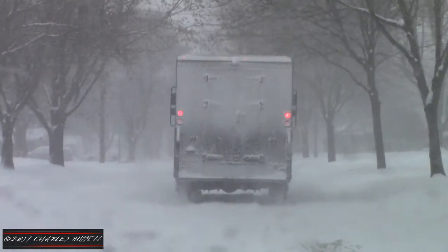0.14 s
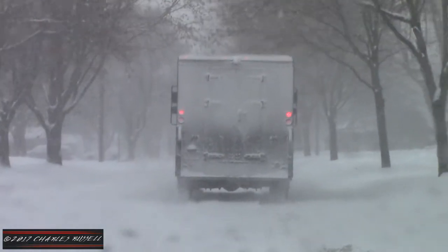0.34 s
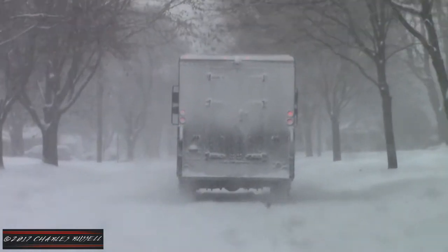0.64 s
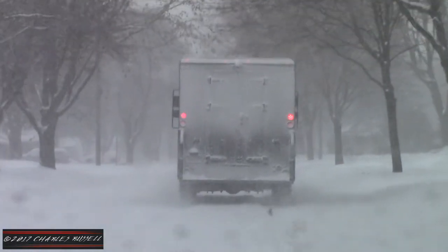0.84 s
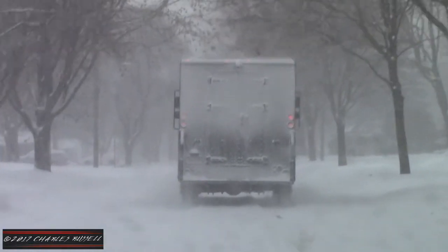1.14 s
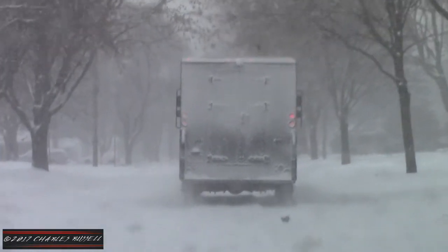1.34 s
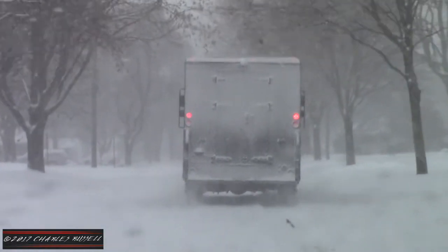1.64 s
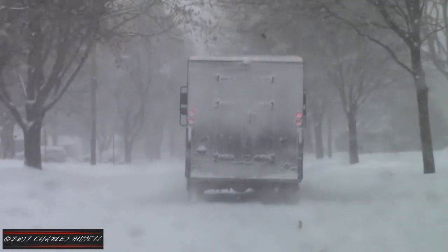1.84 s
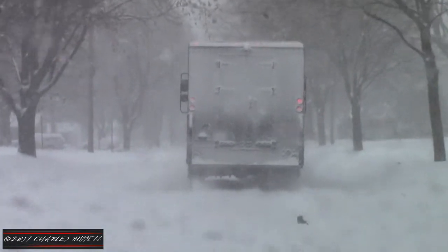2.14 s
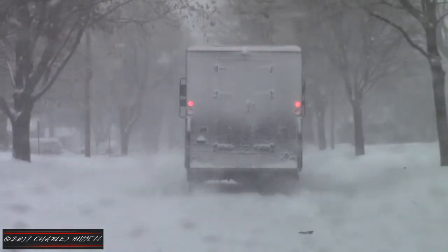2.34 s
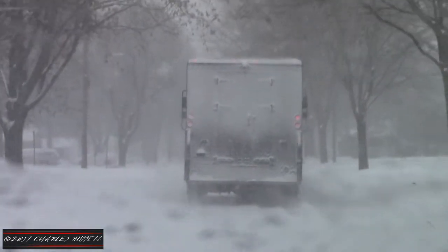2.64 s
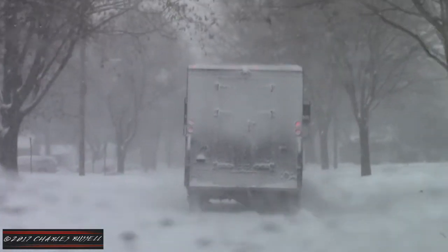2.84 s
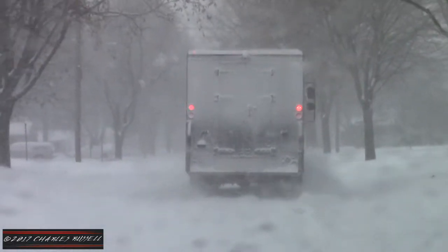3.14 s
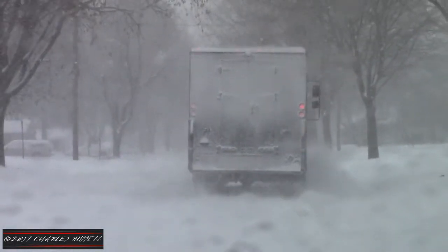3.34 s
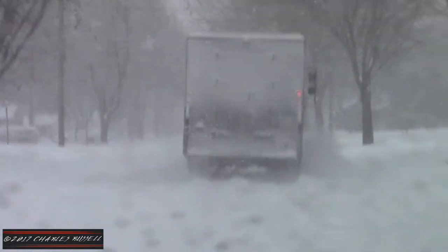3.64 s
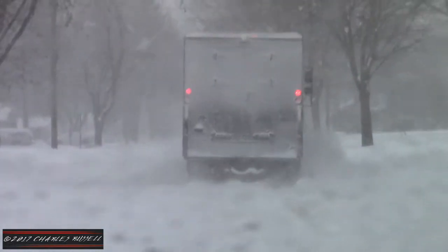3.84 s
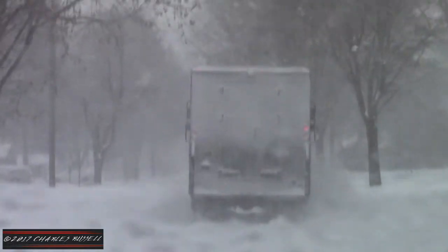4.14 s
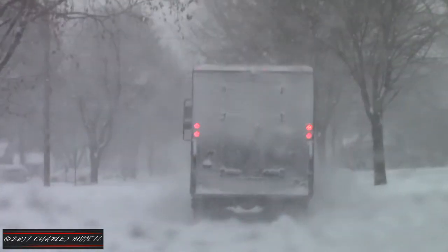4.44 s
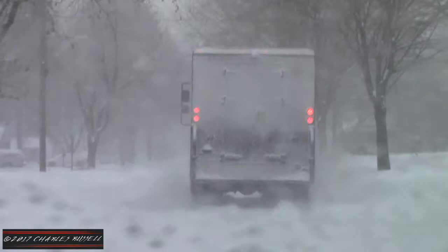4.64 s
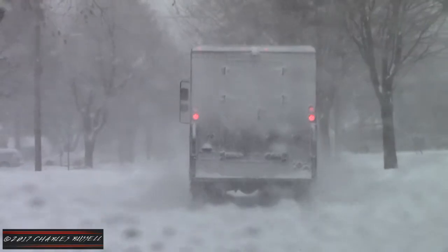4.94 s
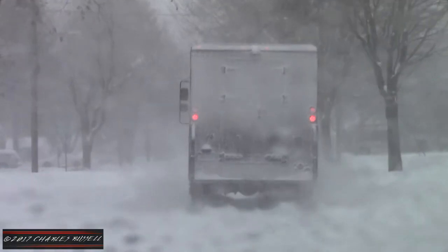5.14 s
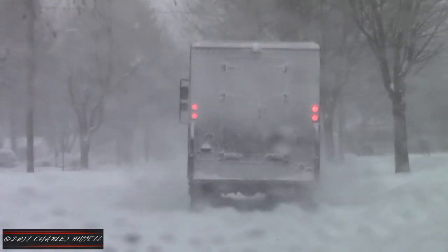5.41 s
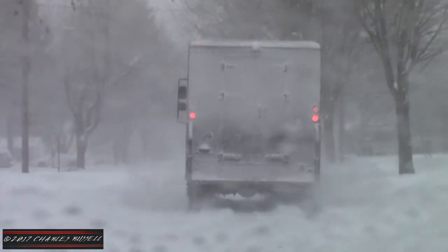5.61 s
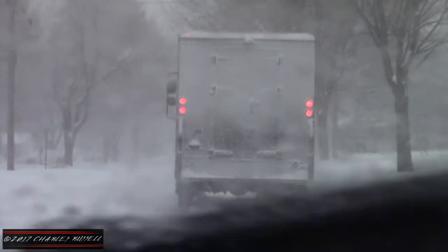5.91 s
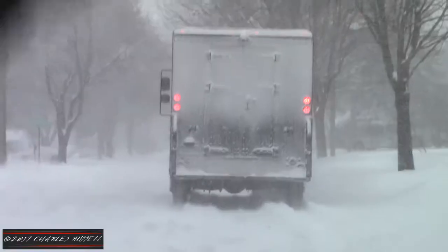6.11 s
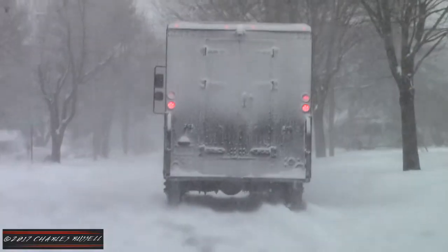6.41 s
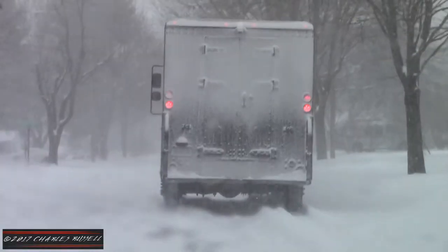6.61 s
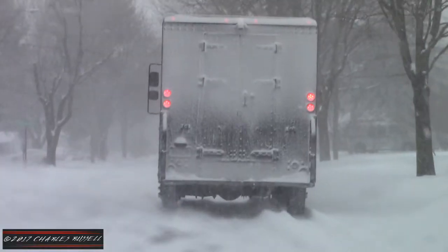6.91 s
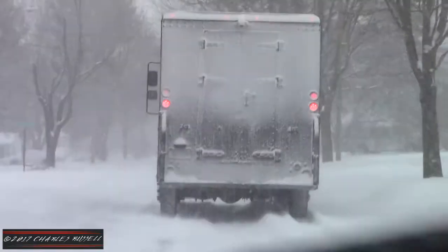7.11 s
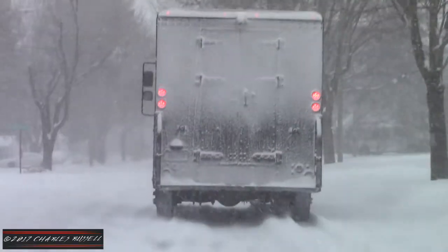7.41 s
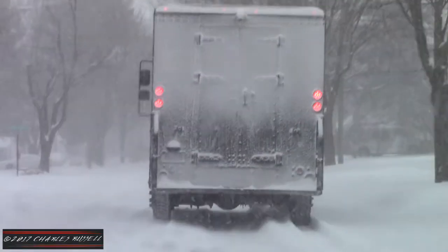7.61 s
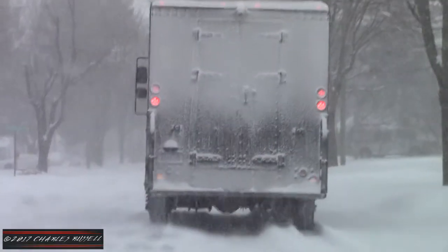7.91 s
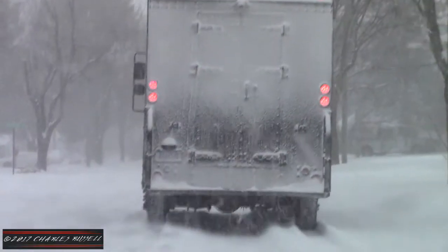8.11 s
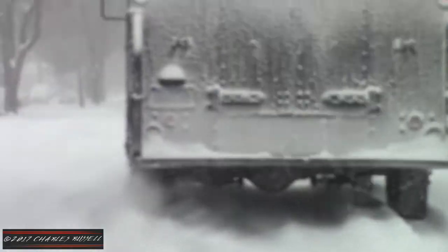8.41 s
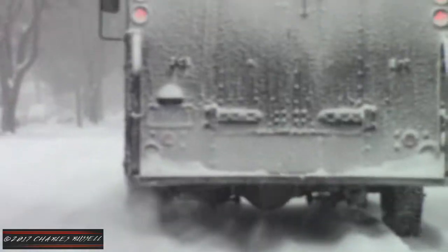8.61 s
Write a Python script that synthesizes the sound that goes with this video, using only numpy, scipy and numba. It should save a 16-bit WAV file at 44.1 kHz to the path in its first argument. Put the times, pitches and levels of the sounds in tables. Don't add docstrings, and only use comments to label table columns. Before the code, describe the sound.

Close, loud heater air roars steadily inside a car crawling behind a truck in deep snow, with dull tyre roll underneath. After nearly six seconds the wiper makes one sweep up and back: hollow linkage knocks, faint rubber drag, sharp ice ticks, a small squeak as it parks. Then a low engine boom swells repeatedly and cuts off with a bump, leaving blower air.

```python
import sys
import numpy as np
from scipy import signal
from scipy.fft import rfft, irfft
from scipy.io import wavfile
from scipy.ndimage import uniform_filter1d
from numba import njit

SR = 44100
rng = np.random.default_rng(int(sys.argv[2]) if len(sys.argv) > 2 else 0)


def unload_audio(sound):
    columns = np.transpose(np.atleast_2d(sound))
    steps = np.round(np.clip(columns, -1, 1) * 32767)
    wavfile.write(sys.argv[1], SR, steps.astype(np.int16))


def nominal_scale(level):
    x = np.asarray(level, float) / 20
    return 10 ** x


N = 386316
SCENE_CHANGE_S = 8.2687


def curve(table):
    s, *columns = np.transpose(table)
    return [np.interp(np.arange(N) / SR, s, c) for c in columns]


def along(points, hz):
    f, value = np.transpose(points)
    return np.interp(np.log(hz + 1), np.log(f), value)


def colour(x, db):
    hz = np.arange(N // 2 + 1) * SR / N
    return irfft(rfft(x) * nominal_scale(db(hz)), N)


def unit(x):
    return x / np.sqrt(np.mean(x ** 2))


def noise(points):
    return unit(colour(rng.standard_normal(N), lambda hz: along(points, hz)))


def walk(rate):
    k = int(SR / rate)
    steps = np.repeat(rng.standard_normal(N // k + 1), k)
    slewed = uniform_filter1d(uniform_filter1d(steps, k), k)
    return unit(slewed[:N])


def tone(hz, wobble):
    return 2 * np.pi * np.cumsum(hz * (1 + wobble * walk(20))) / SR


def swells(rows):
    t = np.arange(N) / SR
    gain = np.zeros(N)
    for s, rise, fall, db in rows:
        spread = np.where(t < s, rise, fall)
        gain += nominal_scale(db) * np.exp(-.5 * ((t - s) / spread) ** 2)
    return gain


# (frequency [Hz], density [dB per Hz])
AIR_SPECTRUM = [(15, -75), (25, -46), (71, -11.5), (101, -6.5), (298, -1), (423, -10), (650, -9.5),
                (974, -19.5), (1140, -16), (1310, -26.5), (2020, -26), (4060, -40), (6410, -38),
                (15600, -57.5)]
# (frequency [Hz], width [Hz], level [dB])
DUCT_RESONANCES = [(35, 15, -3), (53.6, 6.6, 0), (107, 14, -4), (80.5, 16, 2.5), (130.4, 27, 6),
                   (207.6, 42, 4), (230, 19.5, -3.5), (317, 116, 2), (453, 60, 4), (640.6, 54, 5.5),
                   (755.6, 61, 6), (965, 42, -3.5), (1131, 23, 5.5), (1350, 170, 0), (1594, 150, 4.5),
                   (1667, 32, -10.5), (1991, 142, 7.5), (1998, 36, -5), (2414, 245, 6.5), (3083, 61, 6),
                   (5340, 680, -4), (6430, 1000, 5.5), (7820, 230, -4), (8300, 580, 3), (11040, 1020, 9),
                   (14000, 1200, -2.5), (15300, 500, 5)]


def ducts_db(hz):
    resonances = sum(db / (1 + (2 * (hz - f) / w) ** 2) for f, w, db in DUCT_RESONANCES)
    return along(AIR_SPECTRUM, hz) + resonances


# (frequency [Hz], level [dB])
MOTOR_WHINES = [(3688, -59.5), (4059, -67)]


def blower():
    air_db, split_hz = -16, 1500
    roar = rng.standard_normal(N) * nominal_scale(.4 * walk(7) + .9 * walk(22))
    jets = rng.standard_normal(N) * nominal_scale(0.53 * walk(12) + 0.56 * walk(60))
    low = colour(roar, lambda hz: -10 * np.log10(1 + (hz / split_hz) ** 4))
    high = colour(jets, lambda hz: -10 * np.log10(1 + (split_hz / (hz + 1)) ** 4))
    air = unit(colour(low + high, ducts_db)) * nominal_scale(air_db)
    whines = sum(np.sqrt(2) * nominal_scale(db) * np.sin(tone(hz, 0.00209)) for hz, db in MOTOR_WHINES)
    return air + whines


# (frequency [Hz], density [dB per Hz])
SCRAPE_SPECTRUM = [(900, -11), (1500, 1), (2400, 3), (3500, -7), (4800, -11), (5800, -22), (8000, -40),
                   (12000, -70)]
# (frequency [Hz], density [dB per Hz])
RUMBLE_SPECTRUM = [(80, -47), (140, 0), (220, 4.5), (300, 5), (420, -7.5), (700, -13), (1200, -50),
                   (5000, -100)]
# (start [s], end [s], rubber drag at full speed [dB])
WIPER_SWEEPS = [
    (5.72, 6.45, -44),
    (6.6, 7.42, -38.5),
]
# (time [s], rise [s], fall [s], rumble level [dB])
LINKAGE_STRAINS = [
    (5.78, 0.054, 0.1, -15.5),
    (6.2, .06, 0.076, -22.5),
    (6.4, 0.04, 0.078, -23),
    (6.62, .06, 0.087, -19.5),
    (7.08, 0.072, .06, -20),
    (7.245, .04, 0.049, -14.5),
]


def wiper():
    t = np.arange(N) / SR
    drag = np.zeros(N)
    for start, end, db in WIPER_SWEEPS:
        speed = np.abs(np.sin(np.pi * np.clip((t - start) / (end - start), 0, 1)))
        drag += nominal_scale(db) * speed ** 1.2
    rumble = noise(RUMBLE_SPECTRUM) * swells(LINKAGE_STRAINS)
    scrape = noise(SCRAPE_SPECTRUM) * drag * nominal_scale(3.7 * walk(150))
    hum_hz, hum_db, hum_start_s, hum_end_s, hum_edge_s = 221, -23.5, 6.75, 7.3, .08
    inside_s = np.minimum(t - hum_start_s, hum_end_s - t)
    pull = np.clip(inside_s / hum_edge_s + 1, 0, 1) ** 2
    hum = np.sqrt(2) * nominal_scale(hum_db) * pull * np.sin(tone(hum_hz, 0.0035))
    return rumble + scrape + hum + strokes() + ticks() + thuds()


# (time [s], spread [s], level [dB])
RUBBER_SLIPS = [(5.8, 0.01, -45), (6.15, .03, -42), (6.365, 0.0098, -38), (6.415, .013, -41),
                (6.44, 0.026, -36.5), (6.93, .013, -41), (7.0, .04, -48), (7.059, .017, -38),
                (7.125, 0.012, -42), (7.315, .014, -47)]
# (time [s], spread [s], level [dB], centre [Hz])
ARM_SHAKES = [(5.765, 0.032, -20.5, 645), (5.768, 0.019, -26, 1610), (6.035, .004, -36, 2800),
              (6.404, .003, -27.5, 2100), (6.43, 0.037, -21.5, 634), (6.465, .02, -29, 1210),
              (6.69, .006, -29.5, 2000), (7.21, 0.017, -26, 900)]
# (frequency [Hz], width [octaves], level [dB])
FRAME_RINGS = [(1310, 0.18, 0), (2420, .1, 1), (3130, 0.12, -4), (4400, .14, -13), (5000, .5, -18)]
# (time [s], spread [s], level [dB], frequency [Hz])
PARKING_SQUEAKS = [
    (7.2, .025, -39, 3060),
    (7.255, 0.019, -35.5, 2530),
]


def strokes():
    rubber_hz, rubber_octaves, arm_octaves, squeak_octaves = 3300, .45, 0.74, .13
    flip_s, flip_spread_s, flip_db = 5.768, .014, -26.5
    rows = [(*row, rubber_hz, rubber_octaves) for row in RUBBER_SLIPS]
    rows += [(*row, arm_octaves) for row in ARM_SHAKES]
    rows += [(flip_s, flip_spread_s, flip_db + db, hz, wide) for hz, wide, db in FRAME_RINGS]
    rows += [(*row, squeak_octaves) for row in PARKING_SQUEAKS]
    out, t = np.zeros(N), np.arange(-4000, 4000) / SR
    pitch = np.log2(np.arange(len(t) // 2 + 1) * SR / len(t) + 1)
    for s, spread, db, hz, octaves in rows:
        scatter_db = 6 * np.minimum(rng.exponential(size=len(t) // 32), 3.5)
        slips = rng.standard_normal(len(t)) * nominal_scale(scatter_db).repeat(32)
        swell = np.exp(-.5 * (t / spread) ** 2)
        band = np.exp(-((pitch - np.log2(hz)) / octaves) ** 2)
        shake = irfft(rfft(slips) * band) * swell
        start = int(s * SR) - len(t) // 2
        out[start:][:len(t)] += nominal_scale(db) * unit(shake) * np.sqrt(np.mean(swell ** 2))
    return out


# (time [s], peak level [dB], ring [Hz])
ICE_TICKS = [(5.5474, -32, 3870), (5.7513, -18, 3230), (6.0337, -30, 3200), (6.1634, -28, 3560),
             (6.1927, -12.5, 3680), (6.3644, -30, 3780), (6.4024, -16, 3660), (6.4243, -23, 3740),
             (6.6832, -21, 3200), (6.7444, -33, 4010), (6.887, -26, 3300), (6.9252, -25, 4000),
             (6.942, -27, 4000), (7.061, -24, 3800), (7.022, -20, 3840), (7.0469, -27, 3730),
             (7.0744, -28, 3750), (7.1172, -21, 4120), (7.1344, -34, 3250), (7.2644, -30, 3200),
             (7.3048, -25, 3740), (7.3237, -34, 3710), (7.8696, -27, 4000), (8.0232, -26, 4000)]


def ticks():
    out, t = np.zeros(N), np.arange(400) / SR
    snap = np.exp(-t / 0.00063) * (1 - np.exp(-t / .0002))
    for (s, db, hz), drop in zip(ICE_TICKS, rng.random(len(ICE_TICKS))):
        cycles = hz * t * (1.05 + 0.17 * drop) - 200 * hz * t ** 2 * np.exp(-t / 0.0017)
        out[int(s * SR):][:len(t)] += nominal_scale(db + 2) * np.sin(2 * np.pi * cycles) * snap
    return out


# (time [s], peak level [dB], ring [Hz])
LINKAGE_THUDS = [(5.7, -5, 316), (5.726, -5, 288), (5.756, -6, 211), (5.776, -1, 205), (5.789, -7, 269),
                 (5.815, -2, 265), (5.847, -3, 210), (5.92, 0, 270), (6.344, -7, 302), (6.472, -9, 400),
                 (6.687, -1.5, 218), (6.918, -6, 310), (7.13, -3.5, 296), (7.204, -6, 307),
                 (7.254, -5, 218), (7.269, -10, 334), (7.355, -5, 260), (7.999, -4, 227)]


def thuds():
    out, t = np.zeros(N), np.arange(2000) / SR
    blow = np.exp(-t / 0.0071) * (1 - np.exp(-t / 0.003))
    for s, db, hz in LINKAGE_THUDS:
        out[int(s * SR):][:len(t)] += nominal_scale(db + 3) * np.sin(2 * np.pi * hz * t) * blow
    return out


# (time [s], rate [Hz])
FIRING_RATE = [(6.9, 127.4), (7.04, 127.3), (7.26, 138.1), (7.36, 126.2), (7.51, 123.5), (7.66, 133),
               (7.86, 129.7), (7.96, 134.7), (8.27, 136.7)]
# (time [s], rise [s], fall [s], level [dB])
ENGINE_SURGES = [
    (7.0, 0.032, 0.13, -19),
    (7.265, 0.014, 0.023, -17.5),
    (7.37, 0.022, 0.031, -15),
    (7.47, 0.042, 0.026, -12.5),
    (7.59, .055, .06, -4),
    (7.8, 0.12, 0.14, -19.5),
    (8.08, 0.065, 0.056, -8.5),
    (8.21, .04, 0.11, -7.5),
]


def engine():
    phase = tone(curve(FIRING_RATE)[0], .006)
    firing = nominal_scale(.8 * walk(45)) * np.sin(phase)
    overtone = nominal_scale(-18 + 3.5 * walk(25)) * np.sin(2 * phase + 1.2 * walk(30))
    cut = np.clip((SCENE_CHANGE_S - np.arange(N) / SR) / 0.0095, 0, 1)
    return np.sqrt(2) * (firing + overtone) * swells(ENGINE_SURGES) * cut


# (time [s], rise [s], fall [s], level [dB])
SNOW_RUTS = [
    (5.77, .08, .08, -44),
    (7.6, .1, .07, -42),
]


def tyres():
    roll_db, slowing_db_per_s = -40.5, -1.4
    roll = nominal_scale(roll_db + slowing_db_per_s * np.arange(N) / SR) + swells(SNOW_RUTS)
    floor = noise([(15, -18), (30, -5), (55, 10), (90, -32), (200, -45)])
    return floor * roll * nominal_scale(2.0 * walk(2.55))


# (frequency [Hz], left minus right [dB])
PORT_TILT = [(60, 0.5), (500, -.5), (1500, -.5), (4000, -1), (6000, -1.7), (9500, -3), (11500, -2.5),
             (12500, -1), (13500, -.3)]
# (frequency [Hz], density [dB per Hz])
PORT_AIR = [(24, -51), (40, -33), (123, -12), (230, 0), (418, 0), (462, 1), (639, -7.5), (780, -14),
            (1110, -6), (1290, -16.5), (2280, -15), (3000, -24), (6350, -28.5), (11000, -36), (15600, -54)]


def scene():
    cabin = blower() + wiper()
    own = noise(PORT_AIR) * nominal_scale(-42)
    left = colour(cabin, lambda hz: along(PORT_TILT, hz) / 2)
    right = colour(cabin, lambda hz: -along(PORT_TILT, hz) / 2)
    ports = np.array([left + own, right - own])
    return ports + engine() * nominal_scale([[.25], [-.25]]) + tyres()


@njit
def follow(x, attack, release):
    e, out = .15, np.empty(len(x))
    for i in range(len(x)):
        e += (x[i] - e) * (attack if x[i] > e else release)
        out[i] = e
    return out


def top_cut(x):
    return signal.sosfilt(signal.butter(12, 15750, fs=SR, output="sos"), x)


def record(dry):
    before = SCENE_CHANGE_S - np.arange(N) / SR
    power = uniform_filter1d(np.mean(dry ** 2, axis=0), size=2000)
    attack_s, release_s = 0.035, .25
    envelope = follow(np.sqrt(power), 1 / (attack_s * SR), 1 / (release_s * SR))
    duck = np.minimum(nominal_scale(-10.0) / envelope, 1) ** 0.48
    held = dry * np.where(before > 0, duck, nominal_scale(-0.74))
    jump = .39 * np.exp(-np.abs(before) / .003) * np.cos(2 * np.pi * 200 * before) * (before > 0)
    limited = np.tanh(.8 * (held + jump)) / 0.78
    top = signal.ellip(8, .2, 60, 15750, fs=SR, output="sos")
    mix = signal.sosfilt(top, limited)
    return top_cut(mix)


dry = scene()
out = record(dry)
unload_audio(out)
```